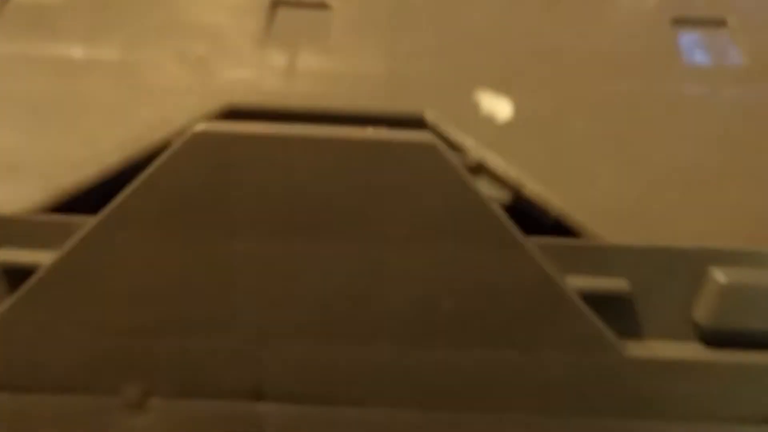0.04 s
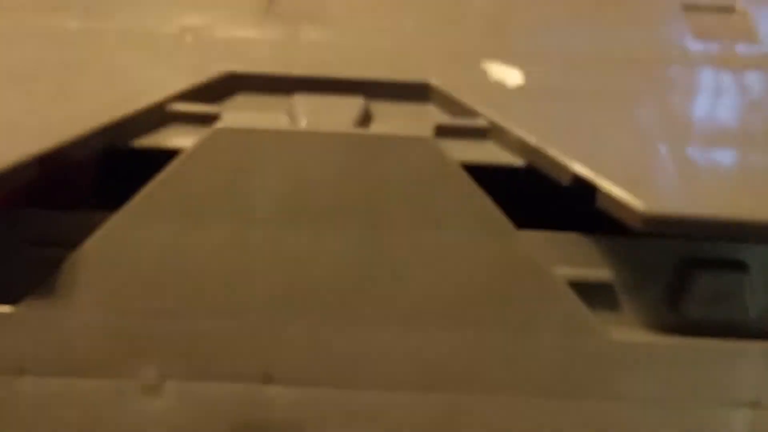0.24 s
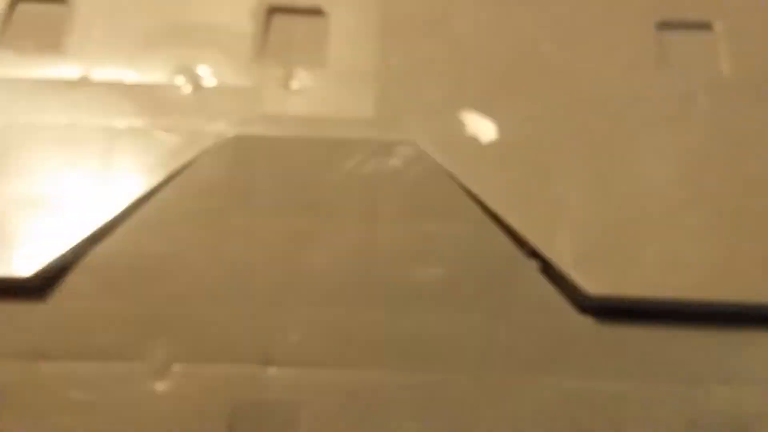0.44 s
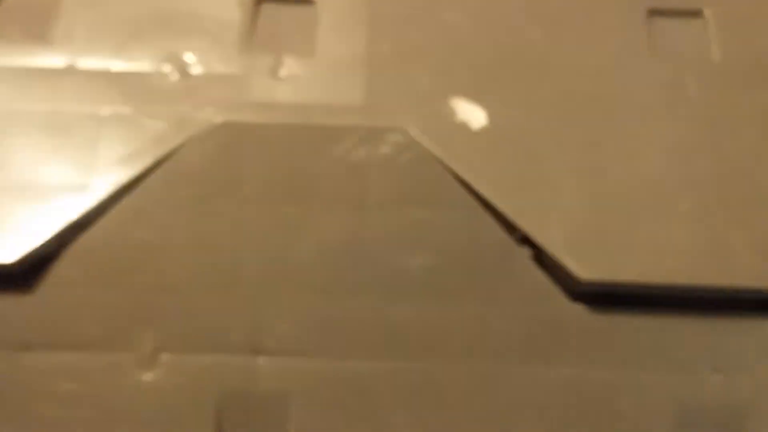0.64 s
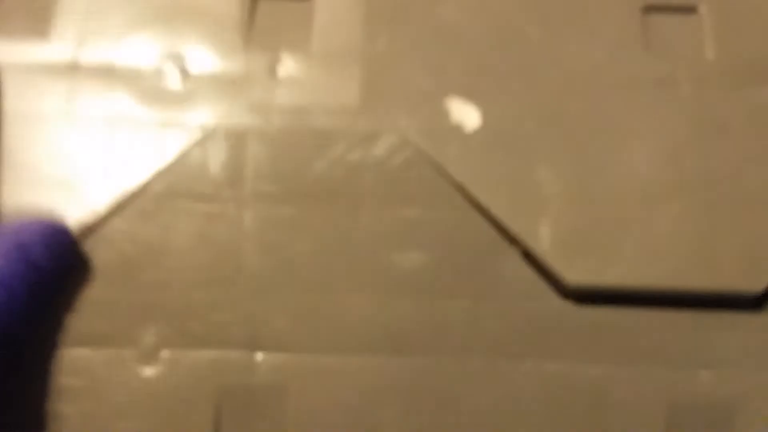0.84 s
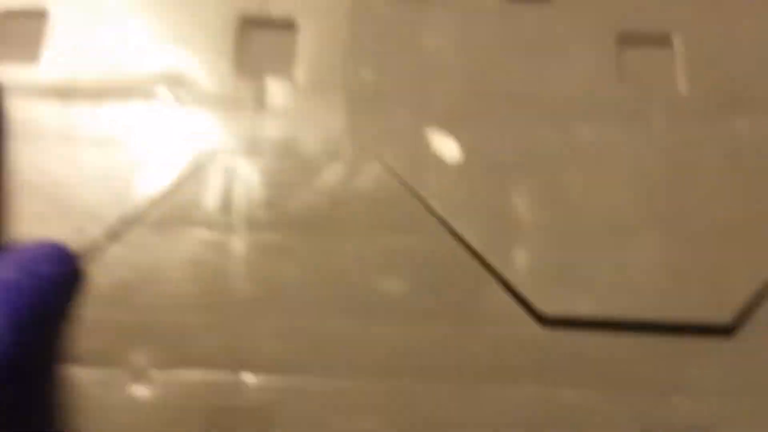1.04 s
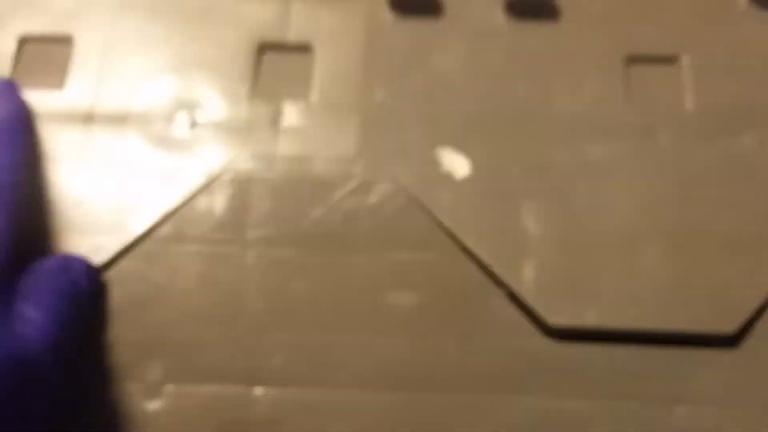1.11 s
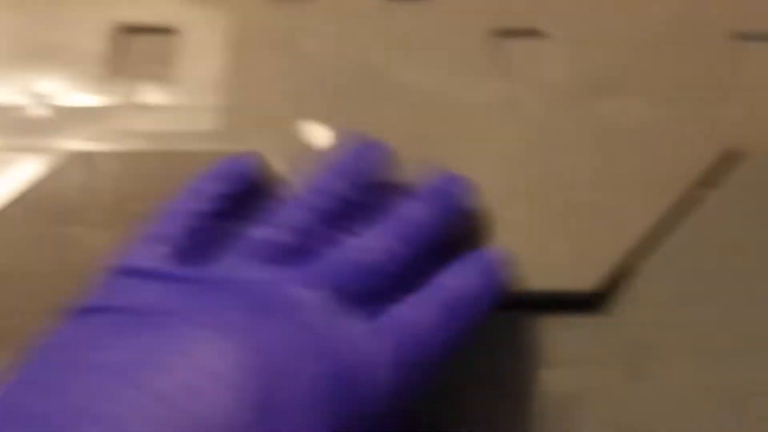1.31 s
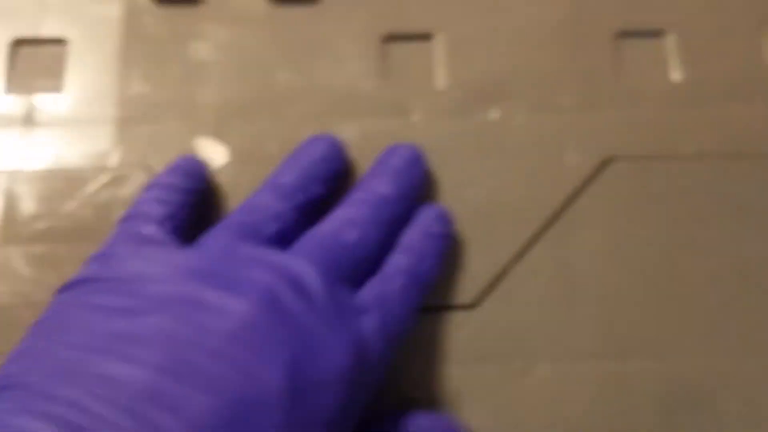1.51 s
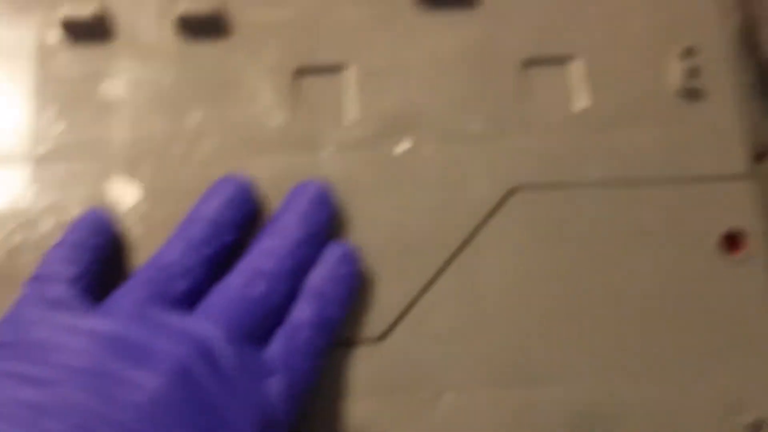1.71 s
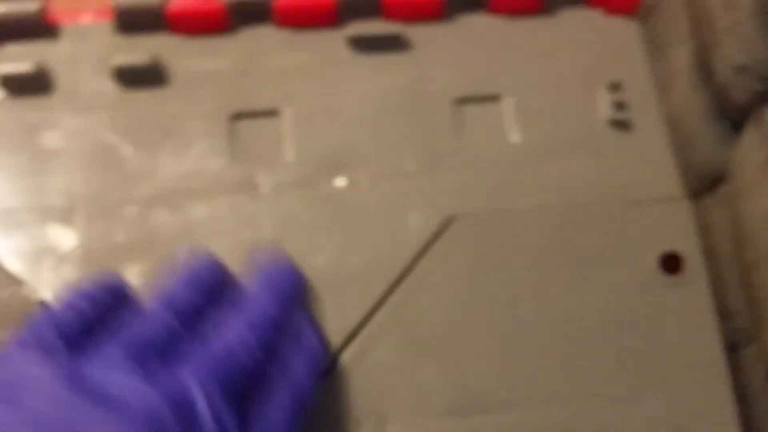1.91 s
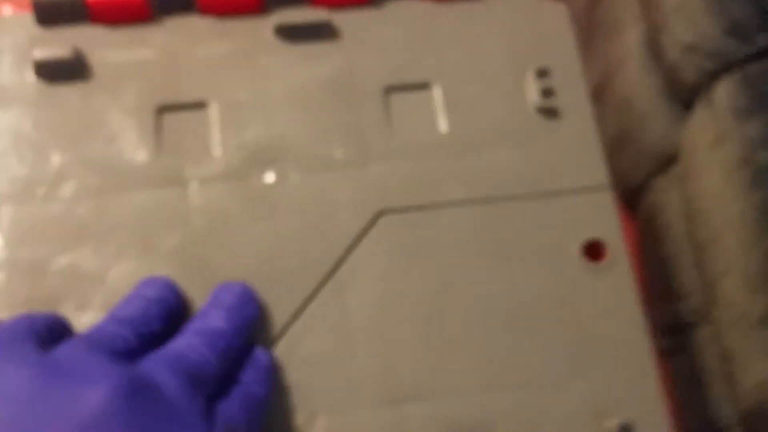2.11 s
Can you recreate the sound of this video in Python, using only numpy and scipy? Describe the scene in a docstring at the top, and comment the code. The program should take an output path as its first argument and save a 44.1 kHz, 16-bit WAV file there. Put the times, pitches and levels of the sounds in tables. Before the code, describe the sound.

A hard plastic storage box lid slaps shut, bounces with hollow knocks, then is patted flat

```python
"""Two interlocking lid flaps of a hard plastic storage box are shut by a gloved hand in a small room.
One flap slaps down and bounces, is pressed until its teeth click home, and is patted flat.
Contacts are coloured noise bursts; blows are decaying sines that excite the modes of the hollow box.
Glove, sleeve and dragging edges are grainy friction noise; a short diffuse echo and steady air noise
surround them."""
import sys
import numpy as np
from scipy import signal
from scipy.fft import rfft, irfft
from scipy.io import wavfile
from scipy.ndimage import uniform_filter1d

SR = 44100
rng = np.random.default_rng(int(sys.argv[2]) if len(sys.argv) > 2 else 0)


def pcm_store(signal):
    """Save signal as 16-bit PCM."""
    levels = np.round(np.clip(np.atleast_2d(signal), -1, 1) * 32767)
    wavfile.write(sys.argv[1], SR, levels.astype(np.int16).T)


N = 94815  # length of the scene [samples]

# Levels in the tables are relative.
# Hard plastic contacts: (time [s], clack level [dB], snap level [dB], top tick level [dB])
CONTACTS = [(0.176,-18.5,-27,-33.5),(.241,-12,-15.5,-7),(0.2442,-3,-3,-3.5),(.248,-8,-1,-11),(.263,-10,-13,-32),(.273,-6,-8.5,-34),
            (0.406,-14.5,-23,-35),(0.42,-16.5,-50,-72),(0.4834,-11,-17,-30.5),(.496,-15.5,-47,-34.5),(.516,-21,-44,-36),
            (0.642,-24,-40,-51),(.855,-23.5,-30,-52),(0.871,-20.5,-50,-33),(0.9124,-23,-29,-32),(0.9264,-24,-17,-32.5),(0.936,-16.5,-25.5,-27),
            (1.138,-32,-47,-46),(1.188,-43,-47,-45),(1.241,-29.5,-45,-43),(1.509,-19,-45,-62),(1.517,-21.5,-32.5,-54),(1.604,-29.5,-40,-37),(1.657,-34,-55,-45),
            (1.857,-34,-45.5,-63),(1.906,-37,-61,-68),(2.02,-32,-42.5,-62),(2.0807,-25,-29.5,-38)]
# Colours of a contact: (frequency [Hz], level [dB])
CLACK_SPECTRUM = [(100,-29.5),(400,2.5),(1300,2),(1950,-1.5),(2400,-9.5),(8000,-41)]
SNAP_SPECTRUM = [(1000,-1.5),(3100,1.5),(7900,-6.5),(9300,-20.5),(15000,-25)]
TICK_SPECTRUM = [(4000,-12),(11500,6.5),(15500,3.5)]
# Modes of the flap, which rings freely only when it is dropped: (frequency [Hz], level [dB])
LID_MODES = [(466,1.5),(654,5.5),(926,1),(1320,-3),(1521,-2.5),(1894,0),(3822,-5.5),(4694,-9)]
# Blows that flex the hollow box: (time [s], level [dB], main pitch [Hz])
BLOWS = [(0,-22.5,168),(.181,-27,337),(0.227,-18.5,218),(.248,-4,226),(.269,-7.5,267),(0.299,-7,194),(0.355,-11.5,226.5),
         (0.404,-9,188),(.485,-8,177),(0.497,-12,266.6),(.511,-28,197),(0.656,-21.5,168),(0.858,-22.5,152),(0.87,-20,278),(.917,-20,206.7),(.928,-17.5,194),(.938,-24.5,383),
         (1.13,-29.5,158.5),(1.188,-29,278),(1.238,-25.5,174),(1.508,-20,262),(1.512,-25.5,159),(1.629,-33,206),(1.862,-34,190),(2.08,-23,165),(2.082,-27.5,287)]
# Modes of the hollow box: (frequency [Hz], level [dB])
BOX_MODES = [(122,-1),(172,-3),(192,-18),(243,0),(292,-4.5),(351,6)]
# The flat of the glove patting the lid: (time [s], level [dB])
GLOVE_PATS = [(1.509,-7.5)]
# Modes of the flap under the glove: (frequency [Hz], level [dB])
PALM_MODES = [(740,1),(1310,3),(1976,-21),(2900,-14),(3700,-16)]
# Strokes with a mid-heavy colour: (middle [s], half length [s], level [dB]); at 0.42 and 0.9 s flap edges drag
# over each other, at 1.23 s the sleeve brushes the box
MID_STROKES = [(.42,0.069,-30.5),(.9,0.021,-36),(1.23,0.044,-43.5)]
# Colour of the dragging edges and of the sleeve brush at 1.23 s: (frequency [Hz], level [dB])
DRAG_SPECTRUM = [(60,-7.5),(170,13.5),(500,-0.5),(1600,-10.5),(10000,-36)]
# Glove sliding over the lid: (middle [s], half length [s], level [dB])
GLOVE_SLIDES = [(.12,0.059,-48),(1.188,0.014,-47.5),(1.41,0.12,-50.5),(1.98,0.045,-51)]
# Colour of the sliding glove: (frequency [Hz], level [dB])
GLOVE_SPECTRUM = [(300,9.5),(2500,-11),(7000,-8.5),(9700,-11.5),(13500,-2)]
# Sleeve brushing the box: (middle [s], half length [s], level [dB])
SLEEVE_BRUSHES = [(0,0.033,-34),(.18,0.068,-39),(1.6,0.069,-43),(2.06,0.027,-47.5)]
# Colour of the sleeve: (frequency [Hz], level [dB])
SLEEVE_SPECTRUM = [(40,-5),(200,10),(500,-7.5),(2500,-18.5),(10000,-27.5)]
# Reverberation time of the room: (frequency [Hz], t60 [s])
ROOM_DECAY = [(150,0.15),(1500,0.3445),(5000,0.47),(15000,0.48)]
# Echo of the room: (frequency [Hz], level [dB])
ROOM_LEVEL = [(200,-2.5),(5000,-4.5),(13000,-8.5)]
# Colour of the still air: (frequency [Hz], level [dB])
AIR_SPECTRUM = [(60,-2),(170,10),(1000,-12),(2700,-17.5),(4100,-10),(5300,-33),(9500,-25.5),(15000,-20.5)]
# Likeness of the two microphones: (frequency [Hz], likeness [0-1])
LIKENESS = [(250,0.95),(1300,0.27),(3000,0.22)]
# Treble colour of the microphones: (frequency [Hz], left minus right [dB])
BALANCE = [(200,.3),(650,1.5),(1300,0),(2000,2.5),(3300,9.5),(5500,15),(7500,10),(13000,-8)]

CLACK_T60_S, SNAP_T60_S, TICK_T60_S = 0.039, 0.017, 0.013
CONTACT_GAIN_DB = 11
WALL_DB, WALL_LENGTH = -15, 5.2  # softer ringing of the walls: level, length in multiples of the t60
DROP_S, LID_DB, LID_T60_S = 0.245, 10, 0.19
CLATTER_DB, CLATTER_GAP_S, CLATTER_T60_S = -9.5, 0.01, 0.51  # level before the contact gain, mean gap
THUMP_RISE_S, THUMP_T60_S = 0.0017, 0.056
PUSH_DB, PUSH_S = -39, 0.012  # air pushed by a blow, its level relative to the swing
BOX_DB, BOX_T60_S = -22, 0.2
PALM_RISE_S, PALM_T60_S = 0.0013, 0.041
AIR_DB = -51.5
CEILING, EDGE_HZ = 0.95, 15900  # saturation amplitude, upper band limit


def amp(db):
    """Level definition: decibels to amplitude ratio."""
    return 10 ** (np.asarray(db) / 20)


def read(points, hz):
    """Linear interpolation of a table on a log-frequency axis."""
    f, value = np.transpose(points)
    return np.interp(np.log(hz + 1), np.log(f + 1), value)


def add(mix, s, sound):
    """Superposition: adds a sound in place from time s."""
    part = mix[..., max(round(s * SR), 0):][..., :sound.shape[-1]]
    part += sound[..., :part.shape[-1]]


def unit(x):
    """Energy normalization: mean energy 1 per channel."""
    mean_energy = np.mean(np.sum(x ** 2, -1))
    return x / np.sqrt(mean_energy + 1e-20)


def convolve(x, response):
    """Linear filtering by stereo convolution, cut to the scene's length."""
    return signal.fftconvolve(np.atleast_2d(x), np.atleast_2d(response), axes=1)[:, :N]


def colour(points, size=4096):
    """Minimum phase: the Hilbert transform of log gain gives a causal impulse response."""
    hz = abs(np.fft.fftfreq(size, 1 / SR))
    log_gain = np.log(amp(read(points, hz)))
    spectrum = np.exp(np.conj(signal.hilbert(log_gain)))
    return np.fft.ifft(spectrum).real[:size // 2]


def pair(x):
    """Spatial coherence: mixes two unrelated channels so that they are most alike in the bass."""
    a, b = rfft(x)
    hz = np.fft.rfftfreq(x.shape[1], 1 / SR)
    turn = np.arccos(np.clip(read(LIKENESS, hz), 0, 1)) / 2
    left = a * np.cos(turn) + b * np.sin(turn)
    right = a * np.cos(turn) - b * np.sin(turn)
    return irfft(np.array([left, right]), x.shape[1])


def fade(t, t60):
    """Exponential damping: decay by 60 dB in t60."""
    return np.exp(-np.log(1000) * t / t60)


def ring(modes, t60):
    """Modal superposition: an impulse response as a sum of equally damped cosines."""
    t = np.arange(SR // 2) / SR
    modal_sum = sum(amp(db) * np.cos(2 * np.pi * hz * t) for hz, db in modes)
    return fade(t, t60) * modal_sum


def contacts(rows, column, spectrum, t60, size=8192):
    """High modal density: heavily damped plastic modes act as a noise burst, and the walls ring on softly."""
    out = np.zeros((2, N))
    t = np.arange(size) / SR
    envelope = fade(t, t60) + amp(WALL_DB) * fade(t, WALL_LENGTH * t60)
    for row in rows:
        noise = pair(rng.standard_normal((2, size)))
        burst = rfft(noise * envelope)
        # Dividing by the root of the magnitude evens out random peaks of the spectrum.
        even = irfft(burst / (abs(burst) + 1e-9) ** 0.5) * fade(t, 20 * t60)
        add(out, row[0], amp(row[column]) * unit(even))
    return amp(CONTACT_GAIN_DB) * convolve(out, unit(colour(spectrum)))


def clatter():
    """Dissipative rebound: the dropped flap chatters on the rim in uneven contacts that die away."""
    gap, strength = rng.random((20, 2)).T
    after = np.cumsum(CLATTER_GAP_S * (0.5 + gap))
    decay_db = 20 * np.log10(fade(after, CLATTER_T60_S))
    level_db = CLATTER_DB + decay_db - 10 * strength
    return np.transpose([DROP_S + after, level_db])


def lid():
    """Impact excitation: flaps clack, edges snap and tick, and the dropped flap chatters and rings."""
    rows = [row[:3] for row in CONTACTS] + [(s, db, db) for s, db in clatter()]
    clack = contacts(rows, 1, CLACK_SPECTRUM, CLACK_T60_S)
    snap = contacts(rows, 2, SNAP_SPECTRUM, SNAP_T60_S)
    tick = contacts(CONTACTS, 3, TICK_SPECTRUM, TICK_T60_S)
    out = clack + snap + tick
    add(out, DROP_S, amp(LID_DB) * unit(ring(LID_MODES, LID_T60_S)))
    return out


def box():
    """Forced and free vibration: a blow swings a wall, pushes air and leaves the hollow box humming."""
    out = np.zeros(N)
    t = np.arange(SR // 4) / SR
    u = t / PUSH_S
    push = amp(PUSH_DB) * 2 * u * (2 - u) * np.exp(-u)
    for s, db, hz in BLOWS:
        rise = 1 - np.exp(-(t / THUMP_RISE_S) ** 2)
        swing = rise * fade(t, THUMP_T60_S) * np.sin(2 * np.pi * hz * t)
        add(out, s, amp(db) * (swing + push))
    hum = convolve(out, unit(ring(BOX_MODES, BOX_T60_S)))
    return out + amp(BOX_DB) * hum


def pat():
    """Compliant impact: the soft glove eases into the flap, whose modes die quickly under it."""
    out = np.zeros(N)
    knock = ring(PALM_MODES, PALM_T60_S)
    t = np.arange(len(knock)) / SR
    knock = unit(knock * (1 - np.exp(-(t / PALM_RISE_S) ** 2)))
    for s, db in GLOVE_PATS:
        add(out, s, amp(db) * knock)
    return out


def hiss(spectrum):
    """Stationary noise: rms near 1 with a given spectrum."""
    return convolve(pair(rng.standard_normal((2, N))), unit(colour(spectrum)))


def rub(strokes, spectrum, grain_db):
    """Friction excitation: grainy noise swells and fades with each stroke."""
    t = np.arange(N) / SR
    level = sum(amp(db) * np.exp(-0.5 * ((t - s) / half) ** 2) for s, half, db in strokes)
    grain = uniform_filter1d(rng.standard_normal(N), size=100)
    return hiss(spectrum) * level * amp(grain_db * grain / grain.std())


def room(x):
    """Diffuse reverberation: a noise echo whose bands each die at their own rate."""
    hz, t, bands = signal.stft(pair(rng.standard_normal((2, SR))), SR, nperseg=256)
    t60 = read(ROOM_DECAY, hz)[:, None]
    gain = amp(read(ROOM_LEVEL, hz))[:, None]
    # The root of t60 keeps a band's energy independent of its decay time.
    bands = bands * fade(t, t60) / np.sqrt(t60) * gain
    tail = signal.istft(bands, SR, nperseg=256)[1][:, :SR]
    build_up = np.clip((np.arange(SR) / SR - 0.004) / 0.0024, 0, 1)  # starts at 4 ms, rises for 2.4 ms
    return convolve(x, tail * build_up * np.sqrt(2 * np.log(1000) / SR))


def scene():
    """Superposition of lid, box and hand, the knocks with their echo, over still air."""
    knocks = lid() + box() + pat() + rub(MID_STROKES, DRAG_SPECTRUM, grain_db=2.5)
    glove = rub(GLOVE_SLIDES, GLOVE_SPECTRUM, grain_db=1.5)
    sleeve = rub(SLEEVE_BRUSHES, SLEEVE_SPECTRUM, grain_db=3)
    air = amp(AIR_DB) * hiss(AIR_SPECTRUM)
    return knocks + room(knocks) + glove + sleeve + air


def record(dry):
    """Transduction: each microphone has its own colour, then soft saturation and a band limit."""
    ports = np.array([colour([(hz, side * db / 2) for hz, db in BALANCE]) for side in (1, -1)])
    heard = convolve(dry, ports)
    heard = heard / (1 + (heard / CEILING) ** 4) ** 0.25
    edge = signal.firwin(401, EDGE_HZ, window=("kaiser", 8), fs=SR)
    return signal.oaconvolve(heard, edge[None], "same", axes=1)


dry = scene()
out = record(dry)
pcm_store(out)
```